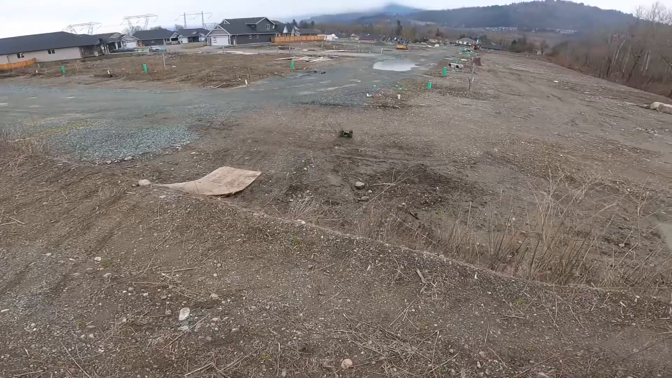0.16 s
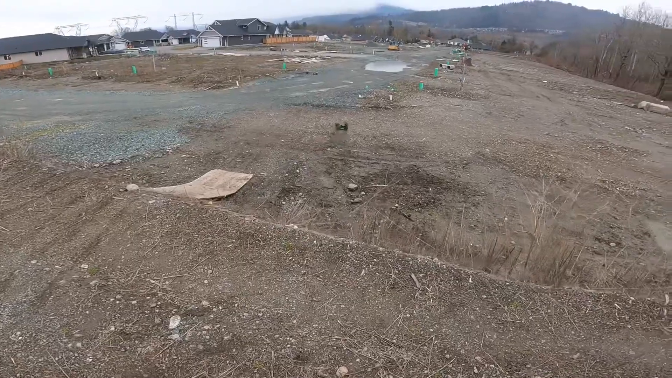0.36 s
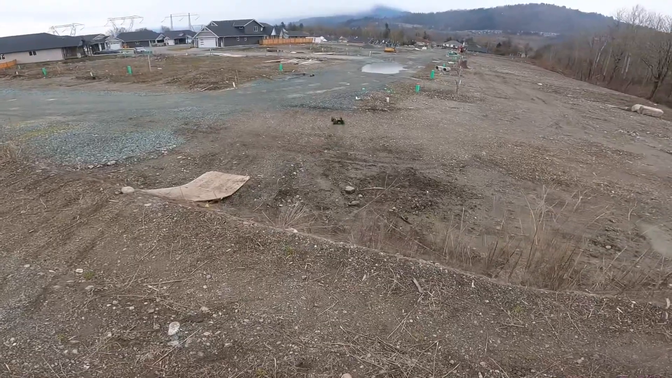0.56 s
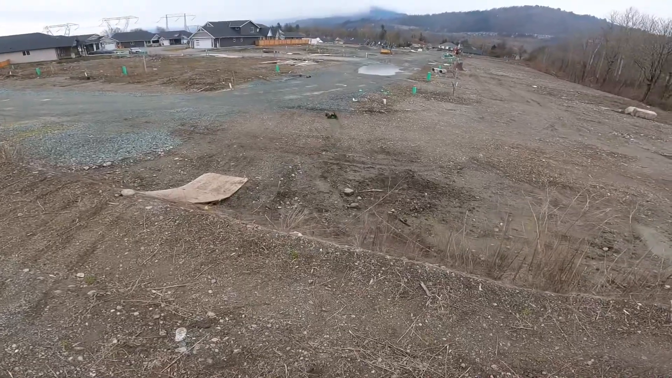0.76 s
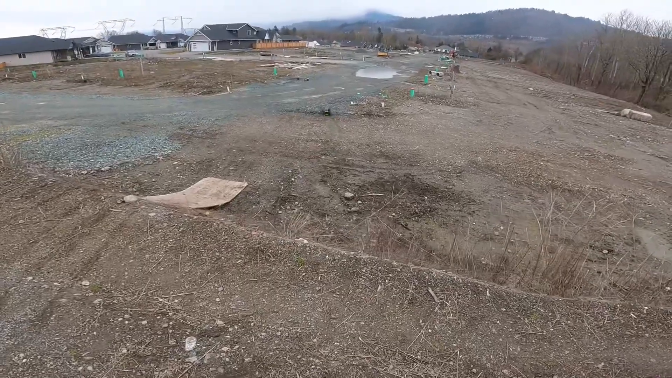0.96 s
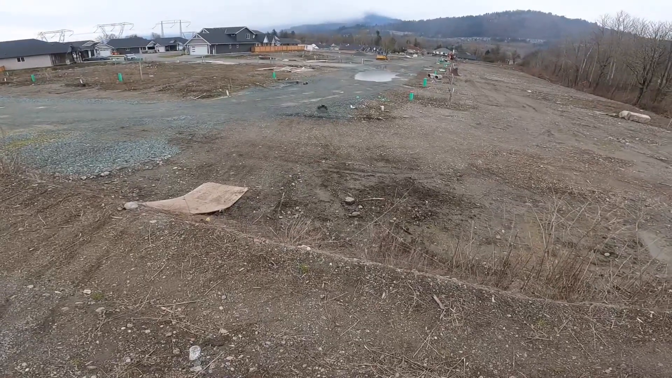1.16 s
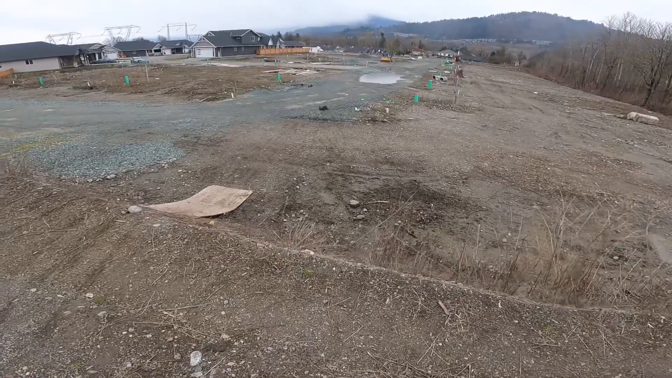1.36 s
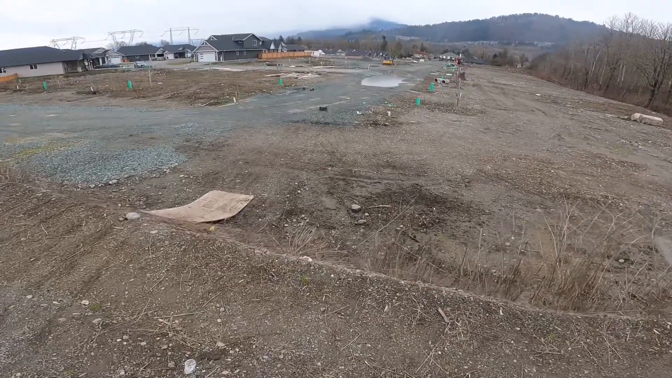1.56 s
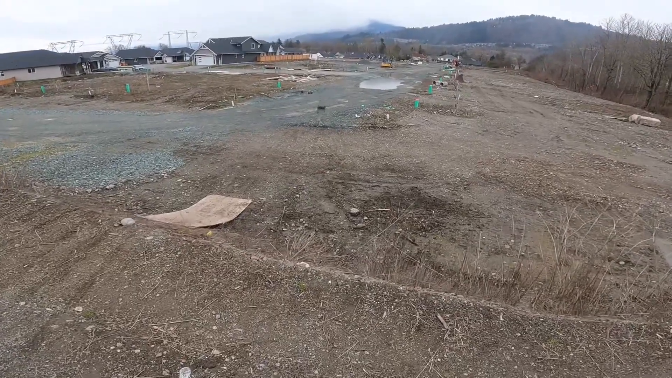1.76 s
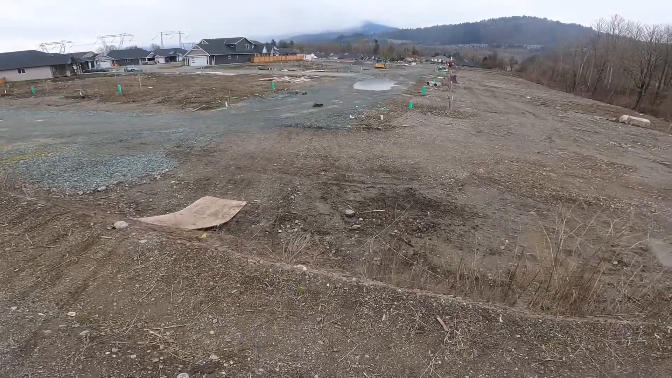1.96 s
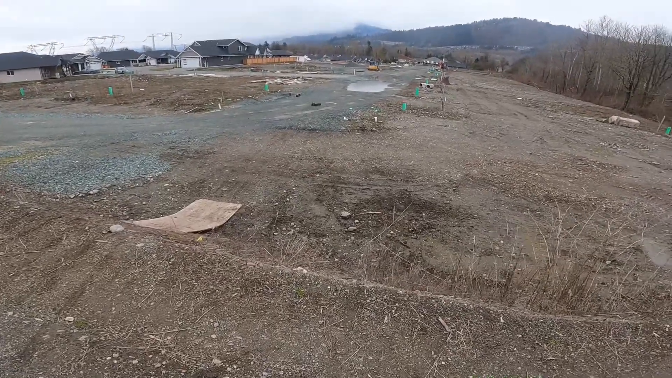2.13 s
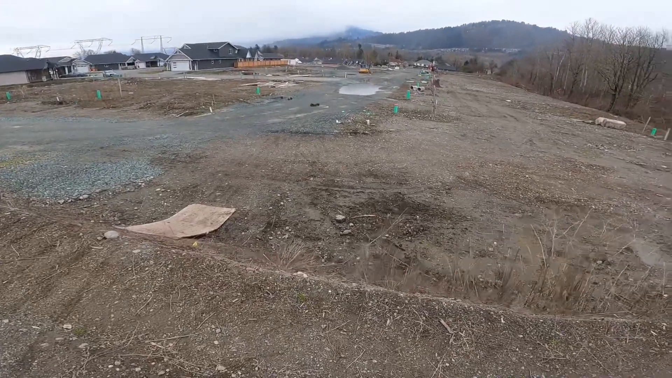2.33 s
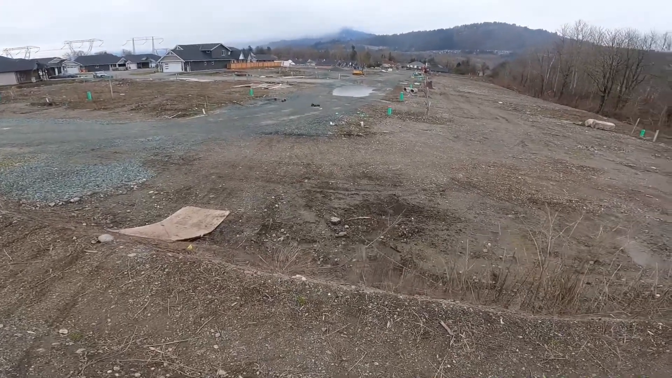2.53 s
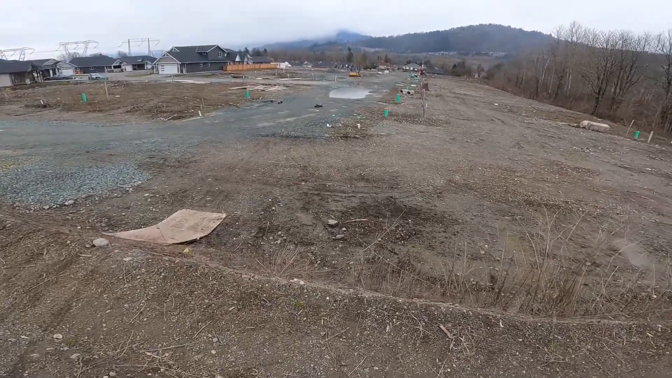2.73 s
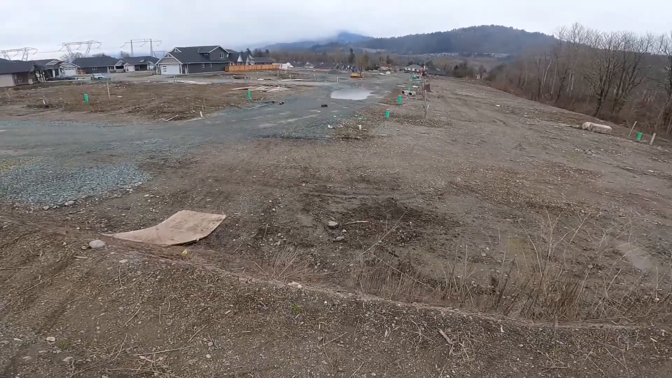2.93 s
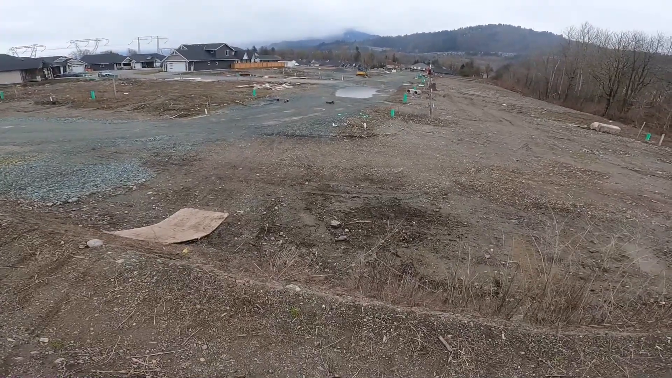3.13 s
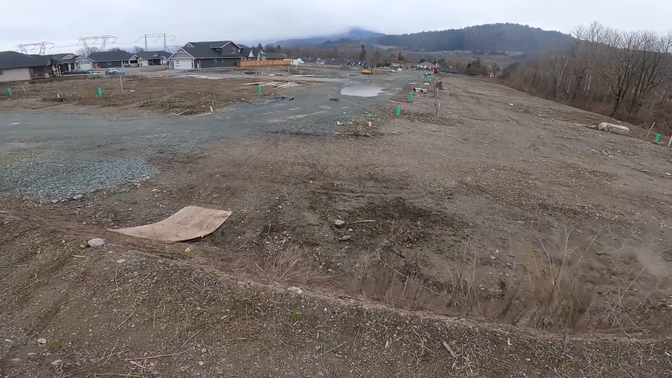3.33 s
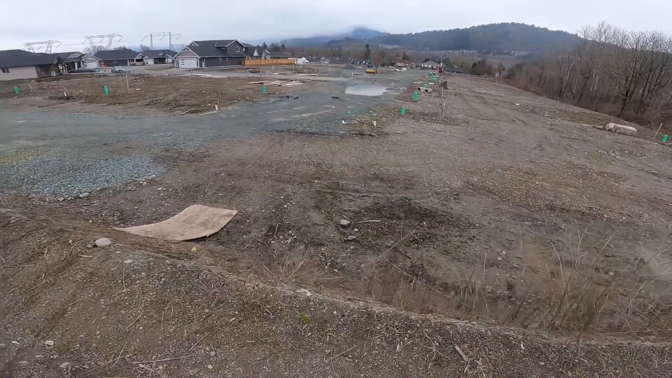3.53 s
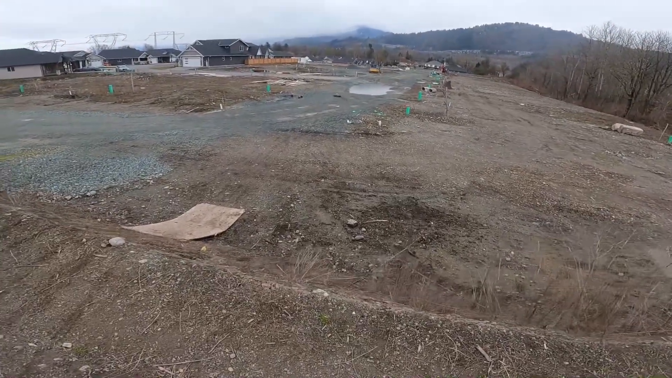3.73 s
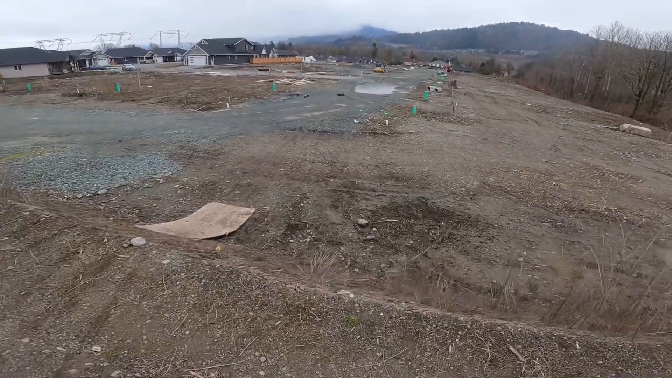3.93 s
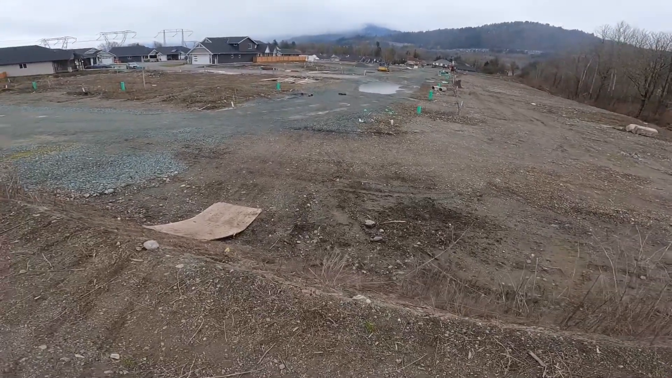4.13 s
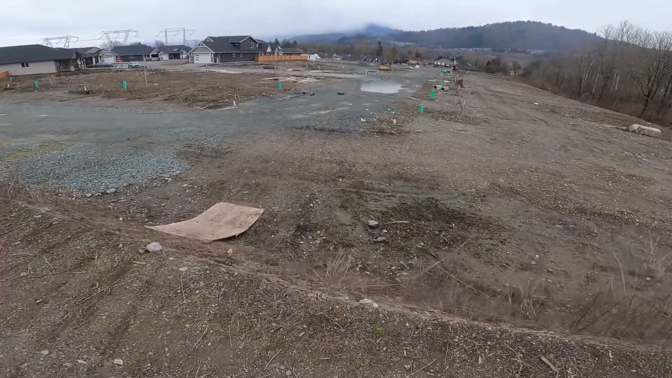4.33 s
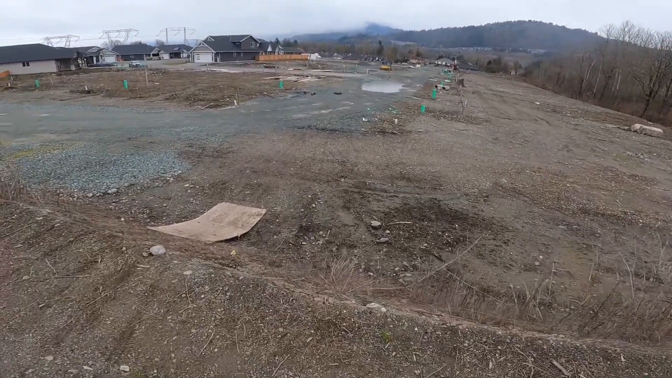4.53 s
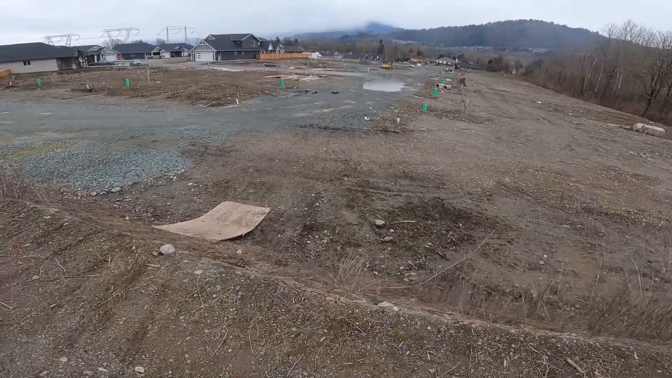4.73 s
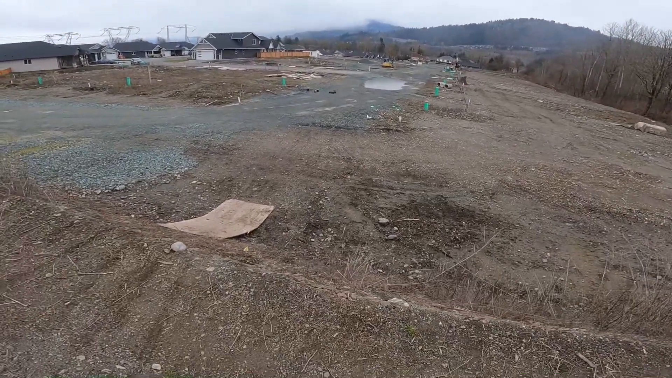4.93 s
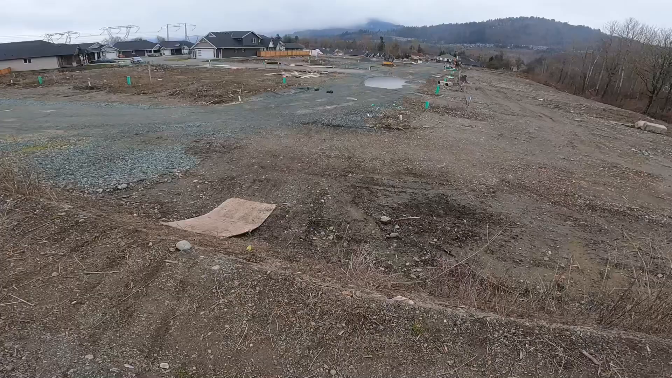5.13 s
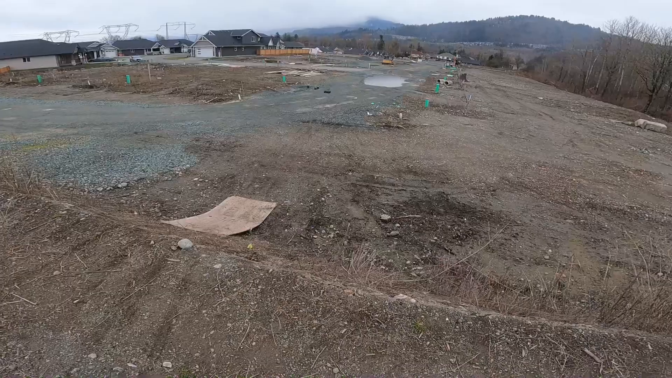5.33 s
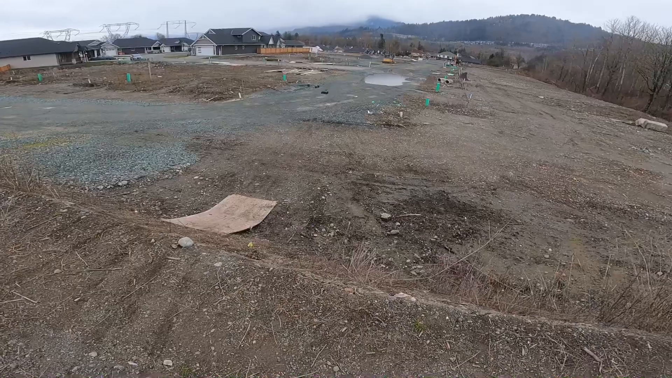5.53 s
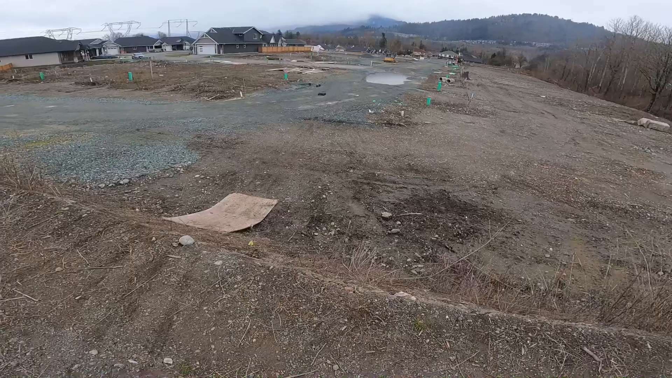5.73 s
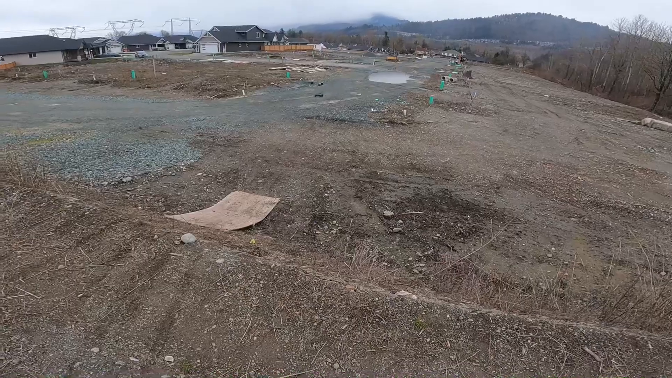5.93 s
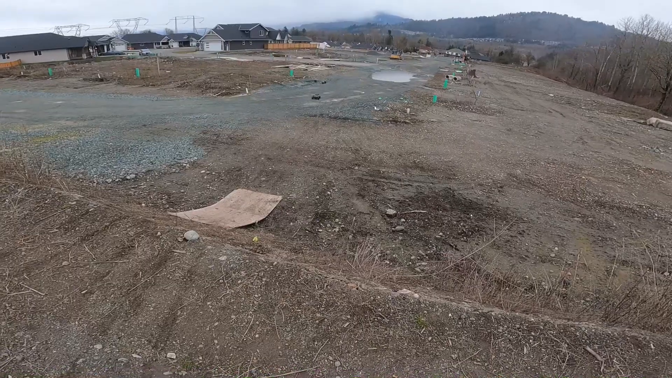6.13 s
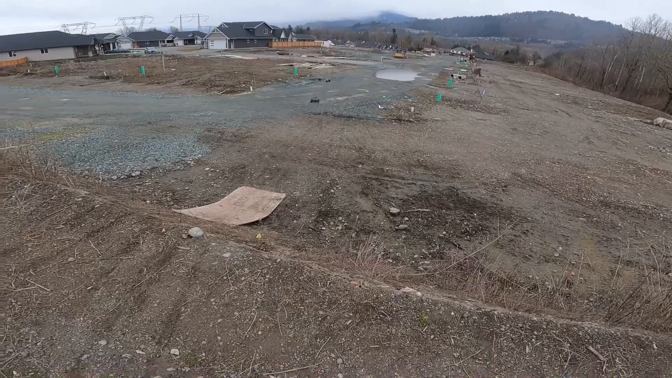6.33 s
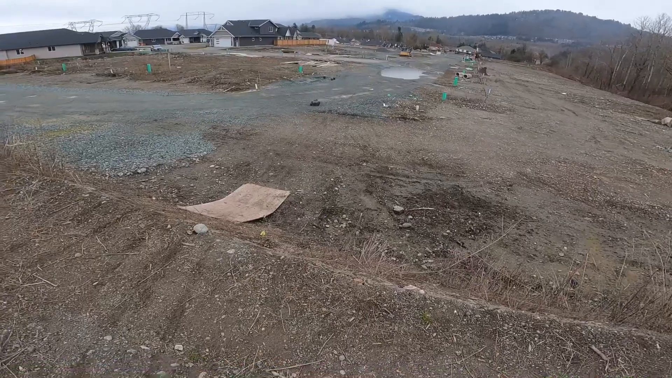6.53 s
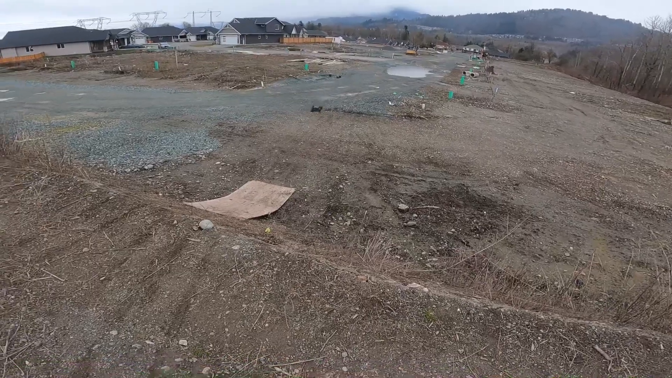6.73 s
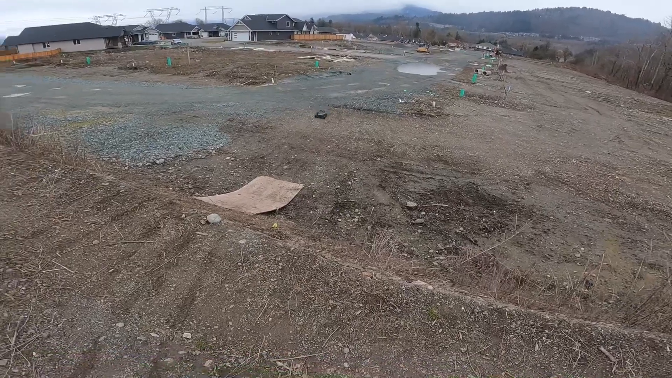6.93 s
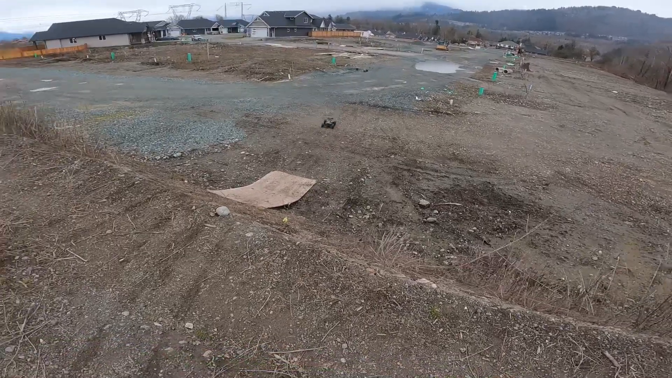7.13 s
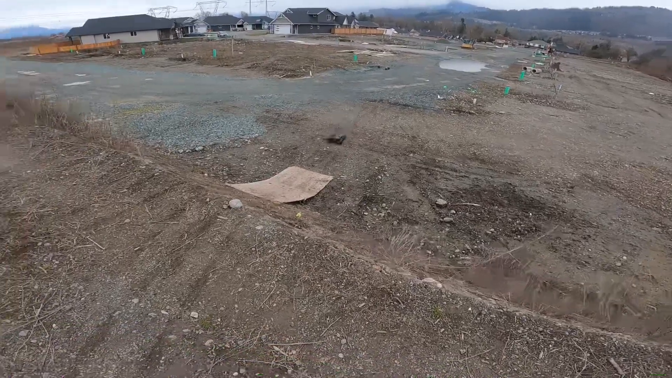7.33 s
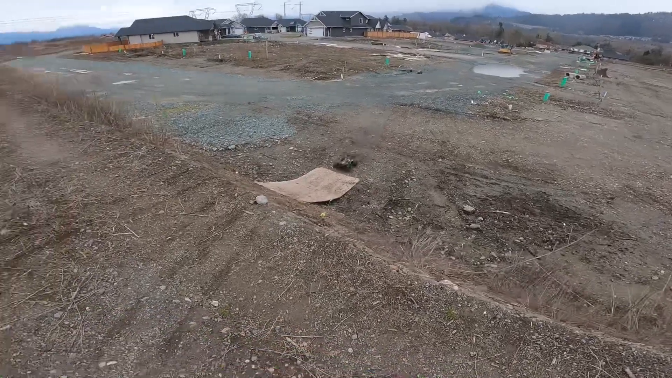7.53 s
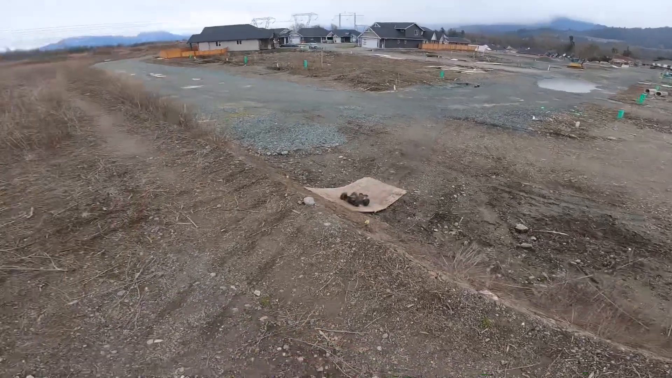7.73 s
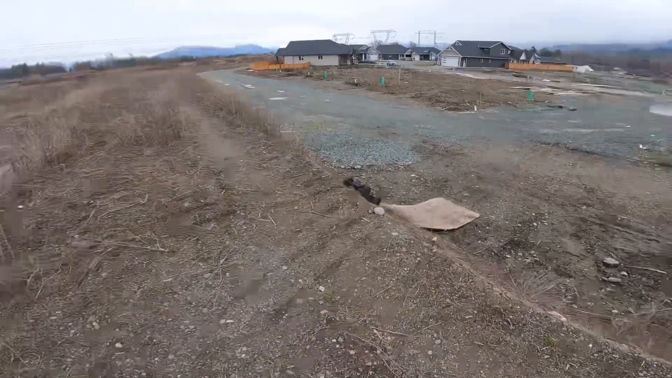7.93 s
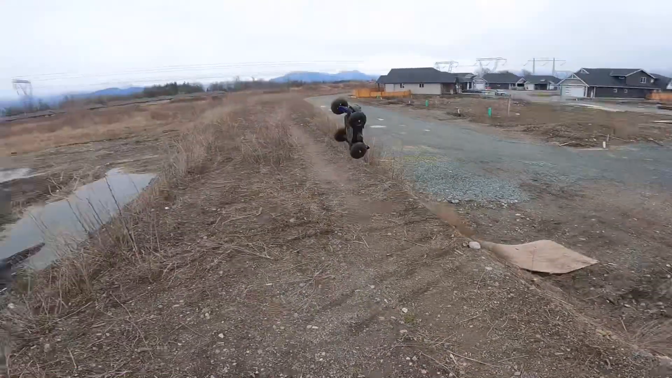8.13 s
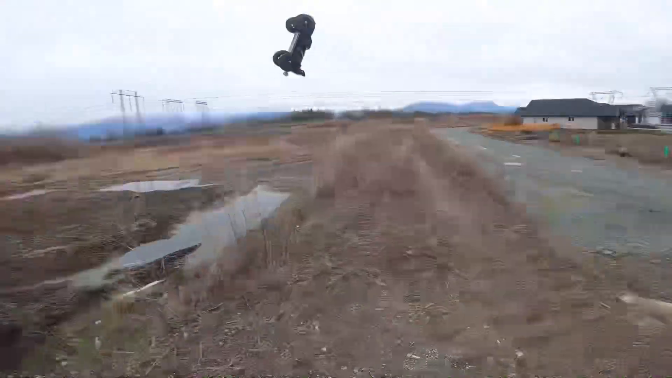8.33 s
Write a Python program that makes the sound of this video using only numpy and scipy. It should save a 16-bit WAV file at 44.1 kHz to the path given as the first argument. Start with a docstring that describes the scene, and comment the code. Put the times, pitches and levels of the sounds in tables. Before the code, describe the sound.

Outdoors, with a fixed-position microphone in a light breeze, a toy electric truck whirrs and crunches away over dirt with ticking stones. Wind bumps come as it turns at a distance; then a low growling whine climbs steadily to a thin high whir. Tyre noise and chassis rattle swell as it nears, two quick hollow wooden slams hit, and the noisy, gritty jump ends abruptly. The sound opens from narrow to wide stereo.

```python
"""Small electric truck off a ramp

A small electric truck drives away over dirt, turns, races back and jumps off a plywood ramp.
The gears are partly smeared tones on sliding pitches; tyres, chassis and ramp are patchy, pitted noise.
Stones are short decaying bursts; a light wind buffets the microphone over a steady low drone.
The stereo image opens from narrow to wide, and a thin hiss sits at the very top."""
import sys
import numpy as np
from scipy import signal
from scipy.fft import rfft, irfft, next_fast_len
from scipy.io import wavfile
from scipy.ndimage import uniform_filter1d, map_coordinates

SR = 44100
rng = np.random.default_rng(int(sys.argv[2]) if len(sys.argv) > 2 else 0)


def store_pcm(level_fs):
    """Save levels as 16-bit WAV."""
    pcm = np.round(np.clip(level_fs, -1, 1) * 32767).astype(np.int16)
    wavfile.write(sys.argv[1], SR, np.atleast_2d(pcm).T)


def volts_from_decibels(level):
    """Turn decibel levels (scalar or array-like) into linear amplitude factors."""
    exponent = np.asarray(level, float) / 20
    return 10 ** exponent


N = 373527  # length in samples


def unit(x):
    """Scaled to rms 1."""
    return x / np.sqrt(np.mean(np.abs(x) ** 2) + 1e-20)


def curves(rows):
    """One value per sample for each column after the time."""
    s, *columns = np.transpose(rows)
    return [np.interp(np.arange(N) / SR, s, column) for column in columns]


def wobble(rate):
    """A smooth random curve, rate knots a second."""
    knots = rng.standard_normal(int(N * rate / SR) + 4)
    return map_coordinates(knots, [np.arange(N) * rate / SR])


def filtered(x, response):
    """x times a response of frequency."""
    m = next_fast_len(N + 8192)
    return irfft(rfft(x, m) * response(np.fft.rfftfreq(m, 1 / SR)), m)[..., :N]


def coloured(x, spectrum):
    """x through (Hz, dB) points joined on a log axis."""
    f, db = np.transpose(spectrum)
    return filtered(x, lambda hz: volts_from_decibels(np.interp(np.log(hz + 1), np.log(f + 1), db)))


def banded(x, hz, width_hz, rows):
    """x with one band raised or lowered along (s, dB) rows."""
    band = filtered(x, lambda f: np.exp(-((f - hz) / width_hz) ** 2))
    return x + (volts_from_decibels(curves(rows)[0]) - 1) * band


def gravelly(per_s, spread_db, share, patchy_db):
    """Noise with patches of random gain, mixed with sparse impacts of very uneven size."""
    z = signal.stft(rng.standard_normal(N), nperseg=512)[2]
    field = uniform_filter1d(rng.standard_normal(z.shape), 7, 0)
    field = uniform_filter1d(field, 5, 1)
    noise = signal.istft(z * volts_from_decibels(patchy_db * unit(field)), nperseg=512)[1][:N]
    hit = rng.random(N) < per_s / SR
    size_db = spread_db * rng.exponential(size=N).clip(0, 3)
    impacts = hit * rng.standard_normal(N) * volts_from_decibels(size_db)
    share = np.clip(share, 0, 1)
    return np.sqrt(1 - share) * unit(noise) + np.sqrt(share) * unit(impacts)


def far_hum():
    """A steady low drone, noise in a narrow band, from somewhere across the lot."""
    return volts_from_decibels(-55.0) * unit(coloured(rng.standard_normal(N), [(110, -44), (150, 23.0), (200, -58)]))


# The breeze, easing at the end. Each row: time in seconds, buffet level in dB.
BREEZE = [(0.0, -53.5), (4.6, -49.5), (8.46, -70)]
# Gusts on top of the breeze. Each row: time of the peak in seconds, peak in dB, half length in seconds.
GUST_SWELLS = [(2.4, -44.5, 0.86), (3.24, -33, 0.067), (3.41, -32.5, 0.06), (4.2, -43, 0.11)]
# Tone of the buffeting. Each row: frequency in Hz, density in dB.
BUFFET_TONE = [(10, -14), (25, -9), (53, 2.5), (110, -11.5), (450, -17.5), (900, -74)]


def wind():
    """Lumpy low buffeting at the microphone, swelling in gusts."""
    t = np.arange(N) / SR
    strength = volts_from_decibels(curves(BREEZE)[0])
    for s, db, half in GUST_SWELLS:
        strength = strength + volts_from_decibels(db) * np.exp(-((t - s) / half) ** 2)
    lumps = volts_from_decibels(0.25 * wobble(15.0))
    return strength * unit(lumps * coloured(rng.standard_normal(N), BUFFET_TONE))


# Wheels slamming the plywood. Each row: time of the peak in seconds, boom level in dB.
PLYWOOD_SLAMS = [(7.72, -28), (7.83, -19)]


def ramp():
    """The plywood booms under the wheels, each slam swelling and then dying away faster than it swelled."""
    swell_db_per_s, die_db_per_s = 139, 196
    t = np.arange(N) / SR
    boom = gravelly(80, 11.0, 0.14, patchy_db=4.0)
    boom = unit(coloured(boom, [(30, -21), (70, -2.0), (120, 8.0), (170, -11), (300, -69)]))
    strength = np.zeros(N)
    for s, db in PLYWOOD_SLAMS:
        strength += volts_from_decibels(db + np.minimum(swell_db_per_s * (t - s), die_db_per_s * (s - t)))
    return boom * strength


# Single stones against the body, and its knocks on the ramp. Each row: start in seconds,
# crack level in dB, knock over crack in dB, both levels before make-up gain and tone shaping.
STONE_HITS = [(0.3094, -34.5, -5.5), (1.508, -36, -19), (1.529, -33.5, -9), (2.09, -45.5, -5),
              (2.197, -40, -13), (2.286, -45, -7), (2.411, -38, -13), (2.485, -40, -8), (2.537, -42.5, -21),
              (3.316, -43, -13), (3.385, -49.5, 8), (3.555, -54, -15), (7.109, -39, -1), (7.591, -26, -2),
              (7.706, -33.5, 7), (7.769, -35.5, 8.5), (7.804, -18.5, -12)]


def stones():
    """Each stone is a few milliseconds of crack over a duller knock."""
    t = np.arange(SR // 40) / SR
    crack, knock = np.zeros(N + SR), np.zeros(N + SR)
    bursts = rng.standard_normal((len(STONE_HITS), 2, len(t)))
    for (s, db, knock_db), burst in zip(STONE_HITS, bursts):
        start = round(s * SR)
        # crack and knock fall 60 dB in 13 and 16 ms
        crack[start:][:len(t)] += volts_from_decibels(db + 6 - 60 * t / 0.013) * burst[0]
        knock[start:][:len(t)] += volts_from_decibels(db + knock_db + 16.5 - 60 * t / 0.016) * burst[1]
    bright = coloured(crack[:N], [(2500, -38), (3500, 9.0), (7000, -0.5), (10000, -14.0), (12000, -60)])
    dull = coloured(knock[:N], [(300, -20), (700, 10), (2800, 5.5), (4000, -26)])
    return bright + dull


# Chassis rattle. Each row: time in seconds, level in dB before a 3 dB trim and the jolts.
RATTLE_LEVEL = [(0.0, -38.5), (0.16, -43), (0.47, -38.5), (0.8, -41.5), (1.36, -39.5), (1.69, -42.5),
                (2.34, -41.5), (2.63, -49.5), (2.85, -49), (3.13, -40.5), (3.53, -49.5), (3.88, -44.5),
                (4.84, -48), (5.5, -39), (6.71, -34.5), (7.64, -26), (7.7, -20.5), (7.8, -20),
                (7.83, -25.5), (7.89, -24.5), (7.93, -31.5), (8.05, -23.5), (8.14, -17.5), (8.155, -22),
                (8.46, -26)]
# Grit stands out more as the truck comes near. Each row: time in seconds, grit over untrimmed rattle in dB.
GRIT_OVER_RATTLE = [(5.2, -11), (7.5, -7), (8.13, -7)]
# Tones of the loose parts and of the grit. Each row: frequency in Hz, density in dB.
RATTLE_TONE = [(900, -14), (1400, -3.5), (2300, -5), (4300, -11.5), (6000, -72)]
GRIT_TONE = [(3000, -7), (5400, -1.5), (6300, -10.5), (7300, -8), (8200, -14), (9700, -12.5),
             (11400, -20.5), (12200, -38)]
# Resonances of chassis plate and shell. Each row: frequency in Hz, width in Hz, strength in dB.
PLATE_MODES = [(2150, 130, -3), (2650, 130, -4), (3450, 330, 1)]
# Ring of the shell's side facing the microphone. Each row: time in seconds, gain in dB on the last resonance.
SHELL_RING = [(0.2, 2.5), (0.5, 7.5), (0.9, 2.5), (2.6, -1.5), (3.6, -8), (4.3, 3.5), (4.7, -1), (5.4, 3.5),
              (6.3, 0.5), (7.3, 2.5), (7.7, -1)]


def plate(f):
    """Response of the plate: a direct share plus its resonances."""
    response = 0.7
    for centre, width, db in PLATE_MODES:
        response = response + volts_from_decibels(db) * 1j * f * width / (centre * centre - f * f + 1j * f * width)
    return response


def chassis(jolts_db):
    """Loose parts rattle through the plate's resonances; grit sprays off the wheels, duller when faint."""
    rattle_db, = curves(RATTLE_LEVEL)
    grit_db = rattle_db + curves(GRIT_OVER_RATTLE)[0]
    loose_parts = coloured(gravelly(800, 2.7, 0.14, patchy_db=2.0), RATTLE_TONE)
    rattle = unit(filtered(loose_parts, plate))
    rattle = banded(rattle, *PLATE_MODES[-1][:2], SHELL_RING)
    grit = unit(coloured(gravelly(530, 4.8, 0.17, patchy_db=2.5), GRIT_TONE))
    top = coloured(grit, [(7000, -22), (9000, 3.5)])
    grit += (volts_from_decibels(0.14 * (grit_db + 30)) - 1) * top
    return volts_from_decibels(rattle_db - 3.0 + jolts_db) * rattle + volts_from_decibels(grit_db + 0.19 * jolts_db) * grit


# Tyres on the ground, before air, landings and jolts.
# Each row: time in seconds, churn level in dB, thrum over churn in dB.
TYRE_LEVELS = [(0.0, -42.5, 2), (1.4, -42, 5), (1.71, -45.5, 3.5), (2.32, -40, 1.5), (2.51, -45.5, -3),
               (2.69, -44.5, 3.5), (2.85, -47.5, -1.5), (3.25, -38.5, 3.5), (3.74, -44.5, -0.5),
               (4.69, -48, -2.5), (6.49, -38, 2), (7.45, -34, 2.5), (7.54, -36, 1.5), (7.6, -30.5, 6),
               (7.72, -24.5, 0.5), (7.83, -26.5, -2), (7.85, -23.5, -13), (7.89, -22.5, -2),
               (7.905, -31, 4.5), (8.12, -22.5, 0), (8.46, -24, -36)]
# Hops with the wheels off the ground.
# Each row: take-off in seconds, landing in seconds, change of the thrum on landing in dB (half for the churn).
WHEEL_HOPS = [(1.142, 1.402, 5.5), (6.659, 6.71, 4.5), (6.838, 6.896, -2), (8.068, 8.603, 0)]
# Tones of thrum and churn. Each row: frequency in Hz, density in dB.
THRUM_TONE = [(60, -7.5), (110, -5), (210, 0), (330, -6), (500, -58.5)]
CHURN_TONE = [(200, -67), (330, 1.5), (620, -1), (910, 2), (1250, -2), (1450, -9.5), (2200, -16),
              (9000, -120)]
# The churn brightens with speed. Each row: time in seconds, gain in dB on its upper half.
CHURN_BRIGHTNESS = [(0.5, -8), (4.5, 1.5), (8.2, 2.5)]


def tyres(jolts_db):
    """Hollow tyres thrum over the ruts while the tread churns loose dirt; both fall away in the air."""
    air_thrum_db, air_churn_db, air_low_db = -20.5, -6, -4.5  # the low half of the churn loses more
    lift_s, thud_s = 0.066, 0.27  # time to lift or land, life of the thud
    t = np.arange(N) / SR
    churn_db, over_db = curves(TYRE_LEVELS)
    air, thud_db = np.zeros(N), np.zeros(N)
    for off, land, db in WHEEL_HOPS:
        air += np.clip(np.minimum((t - off) / lift_s, (land - t) / lift_s) + 0.5, 0, 1)
        thud_db += db * (t > land) * np.exp(-((t - land) / thud_s) ** 2)
    thrum_db = churn_db + over_db + air_thrum_db * air + thud_db
    churn_db = churn_db + air_churn_db * air + 0.5 * thud_db
    thrum = unit(coloured(gravelly(150, 3.8, 0.2, patchy_db=3.0), THRUM_TONE))
    churn = unit(coloured(gravelly(500, 2.7, 0.29, patchy_db=2.5), CHURN_TONE))
    low = coloured(churn, [(950, 1.5), (1100, -37)])
    high = churn - low
    churn = volts_from_decibels(air_low_db * air) * low + volts_from_decibels(curves(CHURN_BRIGHTNESS)[0]) * high
    return volts_from_decibels(thrum_db + jolts_db) * thrum + volts_from_decibels(churn_db + jolts_db) * churn


# The roar has a hollow near 2.1 kHz throughout, deepest late. Each row: time in seconds, gain in dB on that band.
ROAR_HOLLOW = [(3.6, -4), (4.4, -2), (7.2, -7.5)]


def roar():
    """Tyres and chassis shaken by the same jolts, with a hollow band of changing depth."""
    jolts_db = 0.5 * wobble(12) + 0.84 * wobble(35)
    return banded(tyres(jolts_db) + chassis(jolts_db), 2105, 200, ROAR_HOLLOW)  # centre and width in Hz


# Short whines, rasps and ringing bands, some sounding together. Each row: start in seconds,
# length in seconds, first pitch in Hz, last pitch in Hz, peak level in dB before flutter.
SHORT_TONES = [(-0.1, 0.2, 2650, 2530, -40), (1.11, 0.42, 2130, 2010, -41), (1.797, 0.46, 2730, 2650, -47),
               (2.86, 0.22, 3330, 3680, -53), (8.06, 0.09, 3000, 3650, -28), (8.06, 0.1, 2570, 2480, -25),
               (8.06, 0.1, 1700, 1350, -26), (1.75, 0.4, 2100, 2150, -47), (3.17, 0.23, 3050, 2700, -49),
               (8.17, 0.32, 5750, 5250, -36), (8.14, 0.34, 3050, 3400, -34)]
# Long pulls of throttle: driving off, a ragged spurt, the launch after the turn, wheelspin, top speed.
# Each row of a pull: time in seconds, tooth rate in Hz, tone level in dB before flutter.
THROTTLE_PULLS = [
    [(0.25, 1960, -46), (0.31, 2110, -39), (0.4, 2080, -38), (0.43, 2270, -36.5), (0.64, 2290, -38),
     (0.76, 2457, -53), (0.86, 2557, -46), (1.1, 2550, -40.5), (1.15, 2310, -41)],
    [(2.88, 2058, -56), (2.96, 2000, -46), (3.0, 2510, -43), (3.022, 2200, -45), (3.042, 2480, -41),
     (3.066, 2290, -43), (3.085, 2594, -42), (3.16, 2634, -42.5), (3.19, 2780, -53)],
    [(3.84, 745.3, -45.5), (3.93, 1002, -46), (4.03, 879, -38), (4.1, 990, -41), (4.15, 892, -36),
     (4.2, 982, -39), (4.28, 885, -38), (4.38, 970, -37), (4.42, 1130, -48), (4.52, 1200, -41),
     (4.56, 1320, -47), (4.68, 1345, -49), (5.0, 1670, -50), (5.28, 1777, -46.5), (5.38, 2100, -52),
     (5.5, 2490, -46.5), (5.6, 2720, -41.5), (5.72, 2900, -42)],
    [(5.72, 2940, -45), (5.92, 3046, -44.5), (6.2, 3300, -45), (6.35, 3370, -47)],
    [(6.15, 3490, -45), (6.4, 3585, -53), (7.15, 3735, -49), (7.35, 3880, -51), (7.55, 3970, -57)],
]
# The octave rings more at some pitches. Each row: pitch in Hz, octave over tone in dB.
OCTAVE_RING = [(800, 4), (900, -8), (1200, -7), (1320, 5), (1470, -9), (1750, -1), (2600, -8), (3000, -23),
               (3480, -13), (3650, 5), (3950, 5), (5000, -30)]


def tone_tracks():
    """Short tones, then pulls, as rows (s, pitch Hz, tone dB), with an octave level after the turn."""
    turn_s = 3.5  # the octave carries only once the truck faces the microphone
    edge_db = -11  # ends of a short tone under its peak
    u = np.linspace(0, 1, num=7)
    tracks = []
    for s, length, first, last, db in SHORT_TONES:
        swell_db = db + edge_db * (2 * u - 1) ** 2
        tracks.append(np.transpose([s + u * length, first + u * (last - first), swell_db]))
    tracks += [np.array(pull) for pull in THROTTLE_PULLS]
    for i, rows in enumerate(tracks):
        if rows[0, 0] > turn_s:
            octave_db = rows[:, 2] + np.interp(rows[:, 1], *np.transpose(OCTAVE_RING))
            tracks[i] = np.column_stack([rows, octave_db])
    return tracks


# How far each tone is smeared into noise. Each entry: share of noise from 0 to 1,
# for the short tones in order and then the pulls; the octave takes the square root of it.
TONE_SMEAR = [.6, .95, .6, .6, .95, .35, .8, .6, .97, .97, .97, .5, .45, .5, .72, .55]


def gears():
    """Teeth mesh at the tooth rate, uneven teeth and slipping wheels scattering it; short tones join in."""
    t, out = np.arange(N) / SR, np.zeros(N)
    shake = 0.012 * wobble(40) + 0.013 * wobble(160)  # as a fraction of the pitch
    flutter_db = 1.8 * wobble(45) + 0.9 * wobble(14)
    wear = rng.standard_normal((2, 2, 16384))
    for rows, slip in zip(tone_tracks(), TONE_SMEAR):
        hz, *levels_db = curves(rows)
        fade = np.clip(np.minimum(t - rows[0][0] + 0.02, rows[-1][0] + 0.02 - t) / 0.04, 0, 1)
        teeth = np.cumsum(hz * (1 + shake)) / SR
        for order, db in enumerate(levels_db, 1):
            # the error changes every few cycles, so the smear widens with pitch and slip
            place = [order * teeth * slip / 5.5]
            real, imaginary = (map_coordinates(knots, place) for knots in wear[order - 1])
            smear = unit(real + 1j * imaginary)
            share = slip ** (1 / order)
            tone = np.exp(2j * np.pi * order * teeth)
            mesh = (np.sqrt(1 - share) + np.sqrt(share) * smear) * tone
            out += np.sqrt(2) * fade * volts_from_decibels(db + flutter_db) * mesh.real
    return out


def scene():
    """Drone, wind, ramp and truck, the same in both channels."""
    mono = far_hum() + wind() + ramp() + stones() + roar() + gears()
    return np.array([mono, mono])


def top_cut(x):
    """Nothing passes above the cut-off."""
    return signal.sosfilt(signal.butter(12, 15200, fs=SR, output="sos"), x)


# Opening of the stereo image. Each row: time in seconds, width from 0 to 1.
STEREO_WIDTH = [(2.5, 0.1), (3.0, 0.42), (3.8, 0.66), (4.1, 0.9)]
# How much stronger the right port hears a sound. Each row: frequency in Hz,
# side against mid in dB at full width, before the late share is added.
RIGHT_LEAN = [(40, -17), (100, -20.5), (1300, -21.5), (2000, -13), (3300, -18), (5000, -30), (7500, -31.5)]
# Tone of the hiss. Each row: frequency in Hz, density in dB.
HISS_TONE = [(11400, -53), (11800, 1), (12800, -8), (15500, -24)]


def record(dry):
    """As the stereo opens the sound leans right; each microphone port adds its own thin hiss at the very top."""
    mid, width = dry.mean(axis=0), curves(STEREO_WIDTH)[0]
    late = volts_from_decibels(-2.5) * mid[np.clip(np.arange(N) - 400, 0, N)]  # 9 ms late, opposite in sign at the two ports
    side = width * coloured(late - mid, RIGHT_LEAN)
    treble_power = coloured(mid, [(7500, -87), (8500, 3.5)]) ** 2
    treble = np.sqrt(np.abs(uniform_filter1d(treble_power, size=512)))
    # the hiss floor is highest when narrow, and the hiss rides on the treble
    hiss_level = volts_from_decibels(-80.5 - 10 * width) + volts_from_decibels(-15.0) * treble
    hiss = hiss_level * unit(coloured(rng.standard_normal((2, N)), HISS_TONE))
    return top_cut(np.array([mid + side, mid - side]) + hiss)


dry = scene()
out = record(dry)
store_pcm(out)
```